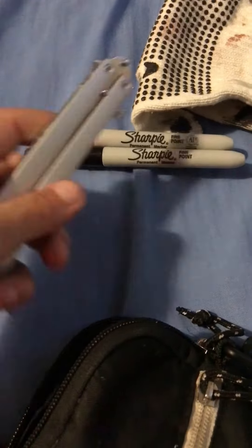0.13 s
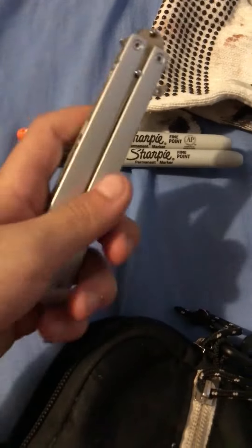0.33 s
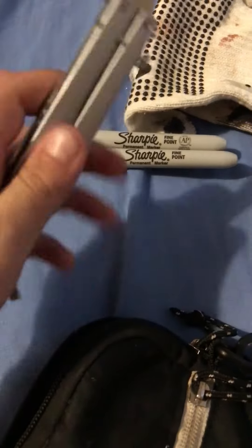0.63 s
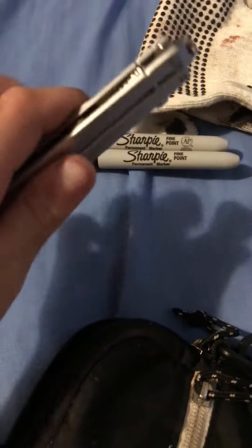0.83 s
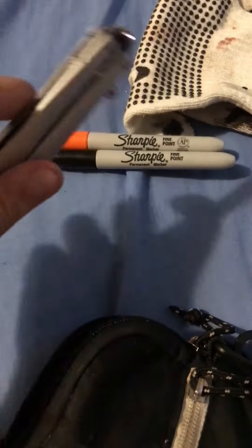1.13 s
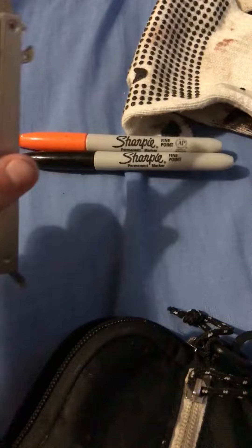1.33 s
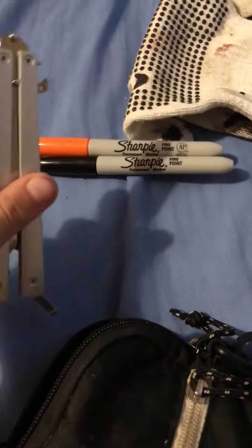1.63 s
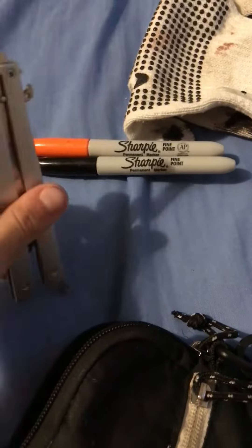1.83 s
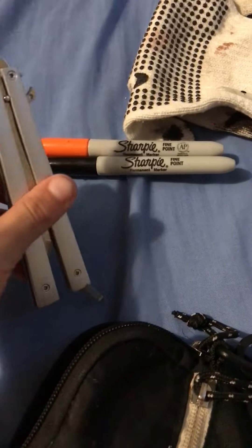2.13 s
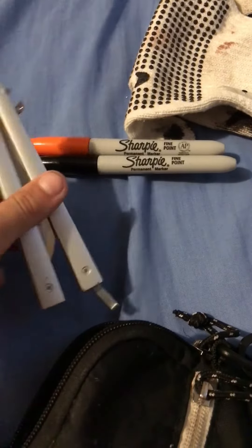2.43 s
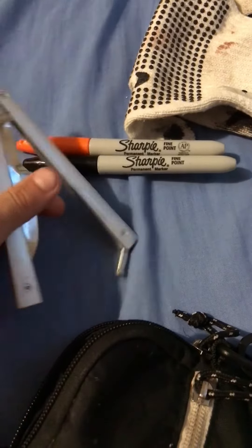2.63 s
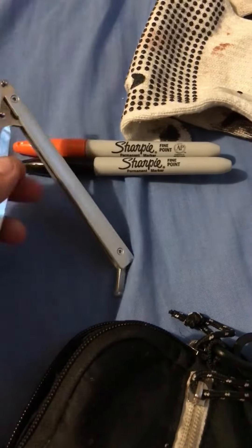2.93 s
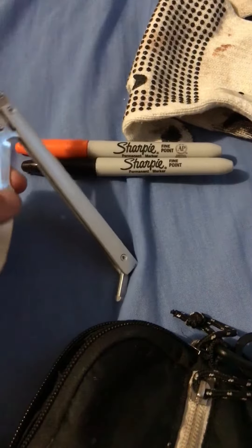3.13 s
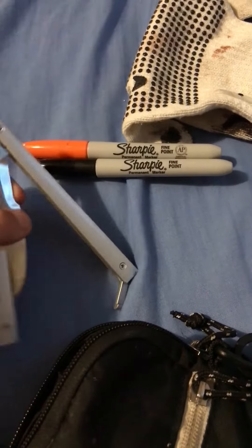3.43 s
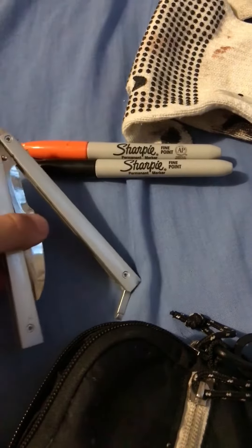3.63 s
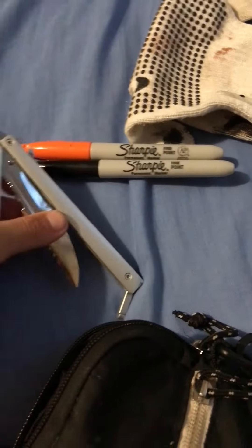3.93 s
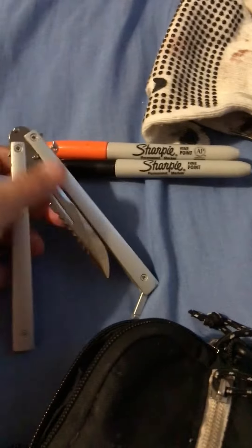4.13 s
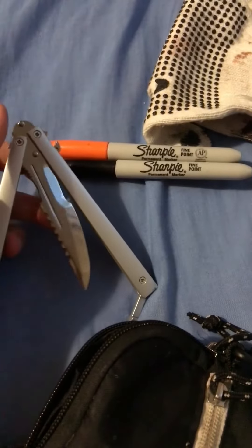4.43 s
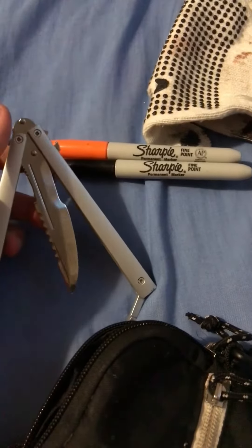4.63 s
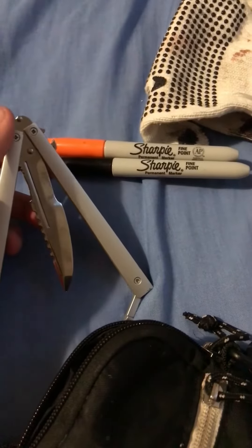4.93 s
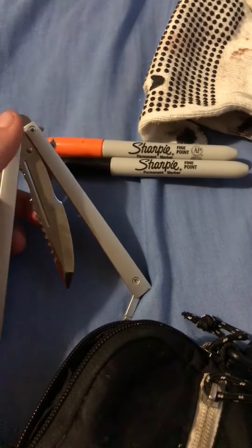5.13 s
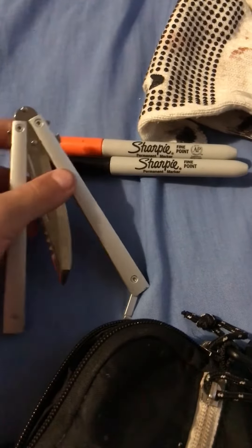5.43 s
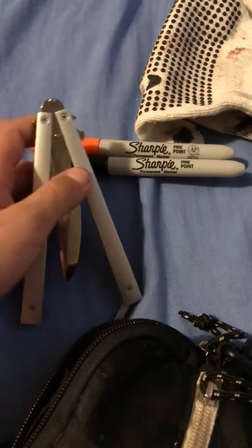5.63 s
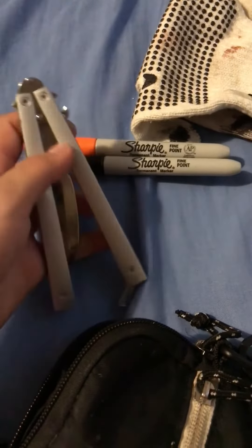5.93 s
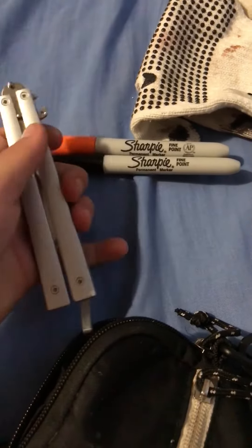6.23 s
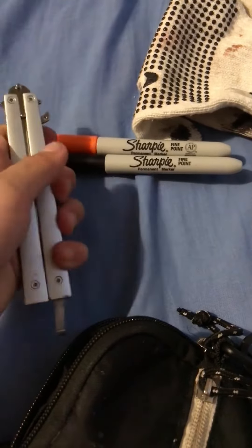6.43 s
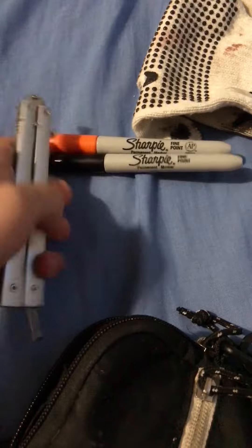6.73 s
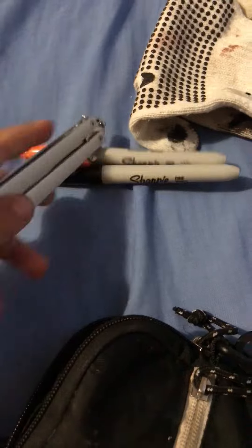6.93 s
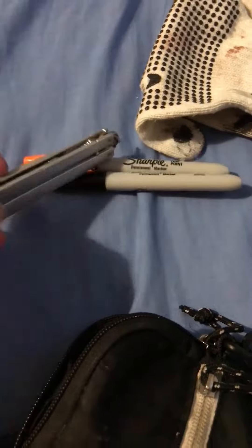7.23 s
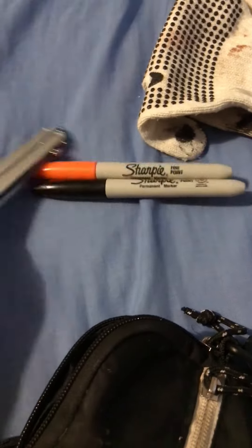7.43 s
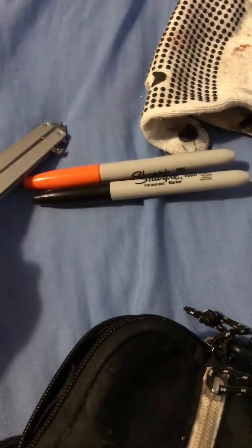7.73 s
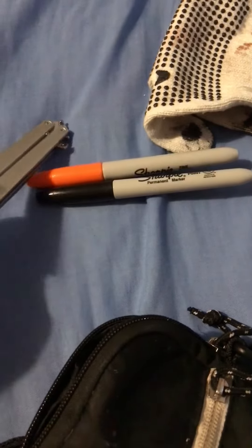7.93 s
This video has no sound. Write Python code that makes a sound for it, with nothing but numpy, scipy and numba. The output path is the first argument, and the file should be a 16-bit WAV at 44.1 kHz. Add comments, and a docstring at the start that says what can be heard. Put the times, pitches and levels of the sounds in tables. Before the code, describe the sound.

Bright, thin metal clicks with very short rings, recorded close indoors on a phone with faint hiss and uneven low rumble. Loose handles clack at once, tick and rattle, then snap loudly as the knife swings open. After a pause of over a second, fingers brush the steel, the handles knock shut in a quick duller cluster, and small clicks and scuffs finish.

```python
"""Metal clicks and knocks in clusters, each with a short bright ring, over steady hiss and a low rumble.
A steel folding knife with two swinging handles is turned, opened and shut by hand over a bed, close to a phone.
Knocks are bursts of noise that also set the steel ringing; thumps are short dull tones.
Sliding fingers are patchy coloured noise, scuffs are gliding bands of noise,
and a fading noise tail adds a small soft room."""
import sys
import numpy as np
from scipy import signal
from scipy.fft import rfft, irfft
from scipy.io import wavfile
from scipy.ndimage import uniform_filter1d
from numba import njit

SR = 44100
rng = np.random.default_rng(int(sys.argv[2]) if len(sys.argv) > 2 else 0)


def log_audio(samples):
    """Write samples as a 16-bit WAV file to the path given in sys.argv[1]."""
    # one column per channel
    frames = np.atleast_2d(samples).T
    # limit to full scale, then quantise
    limited = np.clip(frames, -1, 1)
    pcm = np.round(limited * 32767).astype(np.int16)
    wavfile.write(sys.argv[1], SR, pcm)


N = 356019

# Steel hitting steel: t/s, peak level of the crack before the rattle/dB, favoured pitch/Hz,
# extra body at 2.5 kHz/dB
HITS = [(0.0224, -38.5, 6870, -2), (0.0322, -31, 9240, -17), (0.0377, -18.5, 12200, -6.5),
        (0.0411, -19, 9960, -12.5), (0.2678, -57, 6500, -2), (0.289, -29, 6340, -1),
        (0.5912, -37, 4270, -1), (0.746, -52, 8750, 0), (0.8104, -31, 12200, -6), (0.8465, -32, 12100, 4),
        (0.8513, -28.5, 9950, -7), (0.9026, -39, 9180, 6), (0.9551, -24, 9300, -9),
        (0.9584, -28.5, 9990, 0), (1.0064, -42, 3000, 5), (1.0542, -30, 10000, 0.5),
        (1.0776, -52, 13500, -8), (1.1122, -42, 11400, -3), (1.1782, -48, 6830, 11), (1.218, -40, 14800, 4),
        (1.248, -38, 11400, 13.5), (1.2824, -35.5, 8690, 0), (1.3143, -34.5, 11700, -10),
        (1.4312, -49, 15400, -17), (1.8487, -52, 8370, 6), (1.876, -46, 6060, 7), (1.8956, -51, 13000, -2),
        (1.9078, -44, 6770, -2), (1.9138, -43, 12400, -3), (1.9214, -45, 9020, -3), (1.9298, -35, 6120, -7),
        (1.9437, -28.5, 6850, -2), (1.9524, -42, 6870, -1), (1.9715, -27.5, 6880, -3),
        (2.0303, -27, 11300, 2), (2.1336, -32.5, 6270, -6), (2.138, -24.5, 11000, -2),
        (2.2145, -54, 13800, -4), (2.355, -54, 12300, -5), (2.3689, -46.5, 7100, -5),
        (2.3818, -34.5, 8910, -1.5), (2.4023, -38.5, 15500, 4), (2.5109, -42, 13500, 13.5),
        (2.539, -26.5, 11500, 1), (2.5432, -20.5, 10100, 1.5), (2.5656, -33, 13300, 11),
        (2.599, -46, 13500, 5), (2.6213, -32, 10200, -4), (2.7083, -47, 5840, 8), (2.8, -49.5, 9200, 4),
        (2.8252, -41, 11300, 0), (2.8677, -52.5, 9230, 0), (2.9598, -49, 3000, 6), (2.9708, -40, 9090, 8),
        (3.0733, -44.5, 15400, 2), (3.0934, -49, 9650, -2), (3.0998, -42, 12500, 3),
        (3.1242, -34, 9800, -4.5), (3.1275, -30.5, 11500, -7.5), (3.1725, -12, 11800, -4),
        (3.3156, -42.5, 8420, 2), (3.4129, -38, 13900, -3.5), (3.4423, -33.5, 13800, -1),
        (3.5244, -44.5, 8270, 7.5), (3.544, -47, 9780, 7), (3.5688, -45, 6150, -2),
        (3.6557, -46.5, 6860, -4), (3.6624, -45, 11500, -13), (3.6712, -30.5, 11600, 3.5),
        (3.6814, -17.5, 14700, 4.5), (3.7058, -27.5, 9790, 8.5), (3.7185, -27.5, 11200, 6.5),
        (3.722, -29.5, 11100, 6), (3.771, -43, 8040, 7), (3.7864, -35.5, 8410, -4), (3.8881, -58, 6170, 3),
        (3.9034, -52, 13600, 1), (3.923, -46.5, 13500, 16), (3.9377, -44, 10100, 5),
        (3.9722, -24.5, 10100, -1), (3.9886, -31, 10100, -1.5), (4.0467, -52, 12700, -2),
        (4.059, -48.5, 13600, -6), (4.0709, -46, 13500, 4), (4.101, -49.5, 13600, -2),
        (4.1799, -56, 13500, 3), (4.2733, -51, 13600, -11), (4.3067, -42, 13600, 2),
        (4.323, -46.5, 6320, 10), (5.464, -49.5, 3000, 19), (5.6913, -46, 11500, 14),
        (5.697, -41, 8350, 22), (5.7102, -38, 11500, 8.5), (5.7583, -39.5, 11400, 5),
        (5.765, -29.5, 11700, 3.5), (5.841, -36, 10200, -15), (5.8504, -47, 3680, 11),
        (5.8607, -44.5, 10200, 12), (5.96, -47, 12000, -6), (6.039, -53, 13500, -8),
        (6.0566, -38, 10600, -4.5), (6.0629, -24.5, 9600, 2), (6.0785, -26.5, 3970, 4.5),
        (6.09, -42.5, 3950, 0), (6.1042, -28.5, 6930, 2), (6.1085, -25.5, 9330, 2), (6.1182, -20, 5800, 7),
        (6.129, -24, 6050, 1.5), (6.1409, -20.5, 7500, -1.5), (6.1496, -47, 10800, 5),
        (6.1816, -42, 6320, -10), (6.2437, -41.5, 10900, -12), (6.2718, -32, 11500, 2.5),
        (6.4688, -44.5, 3910, 14.5), (6.6527, -48.5, 3100, 3), (6.673, -48, 8820, 2),
        (6.7053, -36, 8770, -8), (6.7234, -31.5, 9370, -5), (6.741, -25, 6540, 8),
        (6.7498, -20, 8110, 11.5), (6.7535, -22.5, 5680, 0), (6.7646, -30, 7850, -1),
        (6.7877, -31.5, 9010, -3), (6.8511, -39.5, 5610, 12), (6.857, -44.5, 5350, 16),
        (6.8648, -39, 4450, 3), (6.894, -29.5, 6380, 5), (6.9, -20.5, 9580, -10), (6.9516, -41, 6480, 0),
        (7.0082, -36, 6420, -4), (7.0145, -32.5, 6500, -0.5), (7.0419, -51, 6770, 0),
        (7.0566, -51, 6960, 2), (7.085, -50, 5980, 5), (7.2635, -38, 5600, 5), (7.3004, -31.5, 6960, 9),
        (7.3205, -32, 6420, -1), (7.3348, -30, 6470, 2), (7.3447, -44, 6530, -5), (7.397, -33.5, 12400, 1),
        (7.4164, -31, 12400, -23), (7.5802, -49, 6520, 8), (7.6912, -36, 6930, 0),
        (7.7087, -31, 6470, -8.5), (7.726, -24.5, 6410, -11), (7.7471, -39.5, 8680, 4),
        (7.7649, -30.5, 9310, -18), (7.7726, -36, 6440, -4), (7.9044, -45, 5940, 1),
        (7.9082, -39.5, 6520, 3), (7.913, -44.5, 9470, -1.5)]


def undb(db):
    """Turn decibels into a gain."""
    return 10 ** (np.asarray(db) / 20)


def unit(x):
    """Scale to rms 1."""
    return x / np.sqrt(np.mean(x ** 2))


def noise(points):
    """Make noise of rms 1 whose colour follows (f/Hz, level/dB) points."""
    hz, db = np.transpose(points)
    f = np.maximum(np.fft.rfftfreq(N, 1 / SR), 1)
    spectrum = rfft(rng.standard_normal(N))
    colour_gain = undb(np.interp(np.log(f), np.log(hz), db))
    return unit(irfft(spectrum * colour_gain, N))


def curve(s, db):
    """Join level points into a gain per sample, practically silent outside them."""
    return undb(np.interp(np.arange(N) / SR, s, db, -140, -140))


def walk(rate):
    """Random levels with spread 1 that slide to a new value every 1 / rate seconds."""
    hold = int(SR / rate)
    steps = np.repeat(rng.standard_normal(N // hold + 1), hold)
    return unit(uniform_filter1d(steps, hold)[:N])


@njit
def add(out, start, hz, t60, gain):
    """Add modes (the tones a solid rings at), each fading by 60 dB in its time t60."""
    for k in range(len(hz)):
        # multiplying by this each sample turns the tone onward and shrinks it
        turn = np.exp(2j * np.pi * hz[k] / SR - np.log(1000) / (t60[k] * SR))
        z = gain[k] + 0j
        for i in range(start[k], min(start[k] + int(1.3 * t60[k] * SR), len(out))):
            out[i] += z.imag
            z *= turn


def background():
    """Steady hiss, and a low rumble that swells as the phone is moved."""
    # Colour of the hiss: f/Hz, level per Hz/dB
    hiss_colour = [(21, -31.5), (35, -6), (60, -3.5), (88, -8), (167, -12), (287, -14), (380, -17),
                   (604, -21), (800, -22.5), (2960, -29.5), (4350, -29.5), (5770, -32.5), (6390, -32.5),
                   (14900, -34), (16100, -45)]
    # Level of the rumble: t/s, level/dB
    rumble_level = [(0.0, -81), (0.11, -71.5), (0.4, -81), (1.12, -65), (2.4, -73), (2.56, -60),
                    (2.88, -74.5), (3.01, -59.5), (3.28, -76.5), (3.73, -58.5), (3.77, -64.5),
                    (4.27, -76.5), (4.34, -65.5), (5.03, -84.5), (5.26, -68), (5.62, -77), (7.42, -68),
                    (8.07, -76)]
    middle_hz, width_hz = 49.77, 31
    edges = [middle_hz - width_hz / 2, middle_hz + width_hz / 2]
    band = signal.butter(3, edges, "bandpass", fs=SR, output="sos")
    low = signal.sosfilt(band, rng.standard_normal(N))
    hiss_db = -69 + 1.5 * walk(9)
    hiss = undb(hiss_db) * noise(hiss_colour)
    return hiss + unit(low) * curve(*np.transpose(rumble_level))


def bounces(count=3):
    """After each knock the loose parts bounce a few times, weaker as the delay grows."""
    gap_s, first_db, fade_db_per_s = .02, -22, 153
    chance = rng.random((len(HITS), 2, count))
    gaps = gap_s * (.3 - np.log(1 - chance[:, 0]))
    delay = np.cumsum(gaps, axis=1).ravel()
    rows = np.repeat(np.array(HITS, float), count, axis=0)
    rows[:, 0] += delay
    rows[:, 1] += first_db - fade_db_per_s * delay - 8 * chance[:, 1].ravel()
    return rows


def ticks():
    """Faint ticks of loose pins, scattered around the knocks."""
    # the rate counts all ticks drawn; the weakest are later skipped
    per_s, loudest_db, spread_s = 8, -54.5, 0.1
    chance = rng.random((int(per_s * N / SR), 3))
    rows = np.array(HITS, float)[(chance[:, 0] * len(HITS)).astype(int)]
    rows[:, 0] = abs(rows[:, 0] + spread_s * (2 * chance[:, 1] - 1))
    rows[:, 1] = loudest_db + 4 * np.log(chance[:, 2])
    return rows


def knocks(size=2048):
    """Each knock is a dry crack of tiny contacts, and it sets the modes of the steel ringing."""
    # Modes of handles and blade, before random detuning: f/Hz, level/dB, t60 when held loosely/s
    steel = [(3070, -6, .05), (3410, -8, .05), (3920, -5, .06), (4300, -6, .05), (5380, -6, .05),
             (6040, -5, .06), (6460, -3, .06), (6900, -2, .07), (7780, -5, .08), (8100, -3, .07),
             (8420, -3, .07), (8700, -2, .07), (9220, -2, .08), (9440, -4, .06), (9980, -1, .09),
             (10140, 0, .08), (11090, -2, .08), (11330, -5, .06), (11760, 0, .06), (12100, -4, .06),
             (12390, -2, .08), (12690, -2, .06), (13330, -4, .1), (13540, -2, .1), (13920, -4, .06),
             (14680, -5, .07), (15110, -4, .08), (15470, -1, .05)]
    # How the knife is held: t/s, tilt at 13 kHz/dB, ring over crack for a -33 dB knock/dB
    grip_changes = [(0, -9, -9), (0.999, -6.5, -7.5), (1.2, 1.5, -4), (2.0, 1, -7), (2.6, 3, -3),
                    (3.2, -2.5, -9), (3.7, 0, -6), (4.298, -3, -6.5), (5.7, -1.5, -7), (6.1, -2.5, -6.5),
                    (6.8, -10, -6), (7.302, -6, -5), (7.702, -3, -0.5), (8.07, -9.5, -8)]
    # The part that hangs free, whichever part is hit: from t/s, f/Hz
    free_parts = [(0, 9980), (1.15, 11760), (1.8, 6900), (2.3, 10140), (2.75, 11760), (3.85, 13540),
                  (5.0, 10140), (6.0, 9220), (6.6, 6460)]
    grip, linger = 0.4, 1.1  # share of the loose ring time left by the hand; extra factor for the free part
    free_db, scatter_db = 5.5, 12  # boost of the free part; random scatter of the other modes
    unheard_db = -66  # weaker knocks are skipped
    mode_hz, mode_db, mode_t60 = np.transpose(steel)
    hold_s, hold_high_db, hold_ring_db = np.transpose(grip_changes)
    free_s, free_hz = np.transpose(free_parts)
    crack, ring = np.zeros(N + size), np.zeros(N)
    t, f = np.arange(size) / SR, np.maximum(np.fft.rfftfreq(size, 1 / SR), 1)

    # the first contact stands out as a snap above the slower crack (t60 in s)
    crack_t60, snap_db, snap_t60 = 0.032, 7.5, 0.0028
    fade = np.exp(-np.log(1000) * t / crack_t60)
    fade += undb(snap_db) * np.exp(-np.log(1000) * t / snap_t60)
    fade *= np.minimum(t / 0.0004, 1)

    blows = np.vstack([HITS, bounces(), ticks()])
    contacts = rng.standard_normal((len(blows), size))
    chance = rng.uniform(-1.1, 1, (len(blows), 3, len(steel)))
    # each crack has its own peaks and gaps, smoothed over about 500 Hz
    rough = rng.standard_normal((len(blows), len(f)))
    uneven = 4.5 * unit(uniform_filter1d(rough, int(500 / f[1])))
    for blow, grit, gaps_db, (level_chance, start_chance, pitch_chance) in zip(blows, contacts, uneven, chance):
        s, db, pitch_hz, extra_db = blow
        if db < unheard_db or s * SR >= N:
            continue
        # harder knocks have less body at 2.5 kHz
        low_db = -6 - 0.23 * (db + 35) + extra_db
        high_db = np.interp(s, hold_s, hold_high_db)
        ring_db = np.interp(s, hold_s, hold_ring_db)
        nearest = np.argmin(abs(mode_hz - pitch_hz))
        free = mode_hz == free_hz[np.searchsorted(free_s, s, "right") - 1]

        def colour(hz, bump_db, octaves):
            """Where the blow lands sets its tilt and favours one pitch."""
            points_hz = [300, 1000, 2500, 7500, 13000]
            points_db = [low_db - 34.0, low_db - 6, low_db, 0, high_db]
            tilt = np.interp(np.log(hz), np.log(points_hz), points_db)
            distance = np.log2(hz / mode_hz[nearest]) / octaves
            return tilt + bump_db * np.exp(-distance ** 2)

        start = int(s * SR)
        burst_gain = undb(colour(f, 13, 0.11) + gaps_db)
        burst = irfft(rfft(grit) * burst_gain, size) * fade
        crack[start:start + size] += undb(db) * burst / abs(burst).max()

        scatter = np.where(free, free_db, scatter_db * level_chance)
        gain = undb(mode_db + colour(mode_hz, 9, .012) + scatter)
        decay = mode_t60 * grip * np.where(free, linger, 1)
        # the blow spreads through the steel, so the modes start a little apart
        starts = (start + 0.00058 * SR * (1 + start_chance)).astype(np.int64)
        detuned_hz = mode_hz * (1 + 0.0023 * pitch_chance)
        # harder knocks ring more against their crack
        total_db = db + ring_db + 0.1858 * (db + 33)
        add(ring, starts, detuned_hz, decay, undb(total_db) * gain / np.linalg.norm(gain))
    # loose pins rattle, which breaks up the crack and roughens the ring
    crack[:N] *= undb(1 * walk(1500))
    ring *= undb(1.2 * walk(500))
    highpass = signal.butter(4, 700, "highpass", fs=SR, output="sos")
    return signal.sosfilt(highpass, crack[:N] + ring)


def room(dry):
    """Many tiny echoes blur into a short tail of fading noise."""
    level_db, t60 = -12, 0.14  # t60 in s
    t = np.arange(int(.4 * SR)) / SR
    fade = np.exp(-np.log(1000) * t / t60) * np.minimum(t / 0.00293, 1)
    tail = rng.standard_normal(len(t)) * fade
    return undb(level_db) * signal.fftconvolve(dry, tail / np.linalg.norm(tail))[:N]


def thumps():
    """A dull low mode with two weaker overtones; the soft contact rounds the start."""
    # Soft thumps of hand and knife: t/s, level of the lowest mode before the lowpass/dB, f/Hz, t60/s
    soft_hits = [(2.553, -50, 108, 0.13), (3.638, -54, 67.3, 0.15), (3.681, -43.5, 530, 0.022),
                 (3.711, -49.5, 102, 0.1), (4.306, -59.5, 415, 0.026), (5.566, -52.5, 174.7, 0.055),
                 (5.588, -54, 150.6, 0.037), (6.741, -42, 410, 0.016), (6.75, -37, 270, 0.043),
                 (6.756, -39, 225, 0.05), (7.325, -42.5, 138, 0.02)]
    out = np.zeros(N)
    for s, db, hz, t60 in soft_hits:
        starts = np.full(3, int(s * SR))
        modes_hz = hz * np.array([1, 2.2, 3.7])
        decay = t60 * np.array([1, .6, .4])
        add(out, starts, modes_hz, decay, undb(db + np.array([0, -7., -14.])))
    return signal.sosfilt(signal.butter(2, 1500, fs=SR, output="sos"), out)


def slides():
    """Fingers slide along the handles: skin slips unevenly on the steel, in patches."""
    # One list for each slide: t/s, level before the patches/dB
    strokes = [
        [(5.15, -94), (5.244, -75.5), (5.566, -70.5), (5.69, -65.5), (5.856, -77), (5.95, -90)],
        [(7.22, -79), (7.284, -69.5), (7.452, -71), (7.62, -72.5)],
    ]
    # Colour of skin on steel: f/Hz, level per Hz/dB
    skin = [(880, -13), (1500, -13), (2880, -14.5), (3590, -9), (5640, -13.5), (14800, -16), (16000, -27.5),
            (16500, -32)]
    grain_db = 2.5 * walk(300) + 2 * walk(40)
    level = sum(curve(*np.transpose(rows)) for rows in strokes)
    return noise(skin) * undb(grain_db) * level


def scuffs():
    """A short scuff with a pitch: a narrow band of noise whose centre glides."""
    # Scuffs: t/s, length/s, level before the fade in and out/dB, first f/Hz, last f/Hz, width/Hz
    rubs = [(5.55, 0.026, -68, 1600, 1100, 760), (5.5, .16, -70, 3900, 3500, 1000),
            (7.321, 0.008, -51, 1150, 1100, 800), (7.335, 0.055, -62, 700, 1500, 700),
            (7.33, 0.087, -61, 1100, 710, 1950)]
    out = np.zeros(N)
    for s, length, db, first_hz, last_hz, width_hz in rubs:
        n, k = int(length * SR), int(SR / width_hz)
        phase = 2 * np.pi * np.cumsum(np.linspace(first_hz, last_hz, n)) / SR
        # slow noise on a sine and a cosine widens the tone into a band
        wobble = uniform_filter1d(rng.standard_normal((2, 8192)), k)[:, :n] * np.sqrt(k)
        band = wobble[0] * np.cos(phase) + wobble[1] * np.sin(phase)
        out[int(s * SR):][:n] += undb(db) * np.sqrt(np.hanning(n)) * band
    return out


def scene():
    """Add the knife, its room tail and the background."""
    knife = knocks() + slides() + scuffs() + thumps()
    return (knife + room(knife) + background())[None]


def record(dry):
    """The phone drops the deepest bass, steps down near 15.8 kHz and cuts off steeply above 16.5 kHz."""
    top_hz = 15800
    thin = signal.sosfilt(signal.butter(4, 36, "highpass", fs=SR, output="sos"), dry)
    step = signal.firwin2(401, [0, top_hz - 300, top_hz + 50, SR / 2], [1, 1, .13, .13], fs=SR)
    soft = signal.fftconvolve(thin, step[None], "same")
    return signal.sosfilt(signal.ellip(8, .2, 70, 16500, fs=SR, output="sos"), soft)


dry = scene()
out = record(dry)
log_audio(out)
```